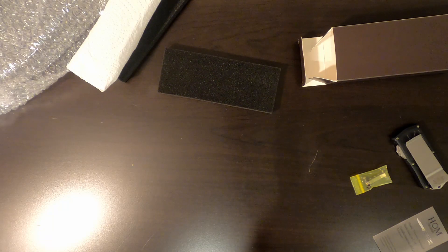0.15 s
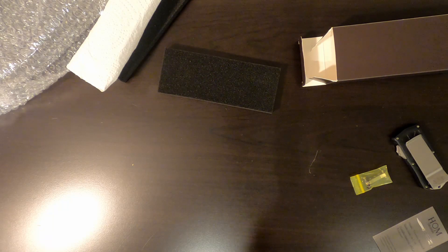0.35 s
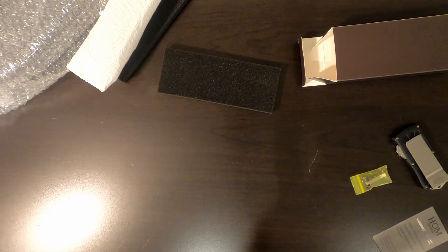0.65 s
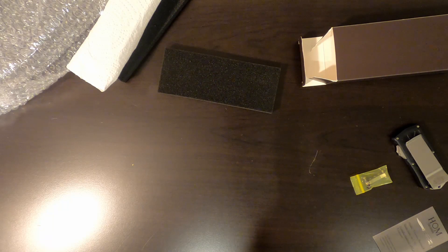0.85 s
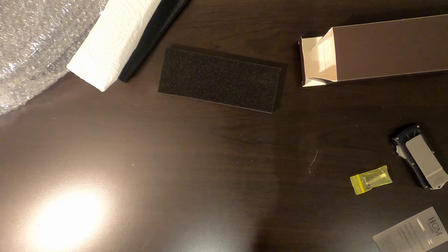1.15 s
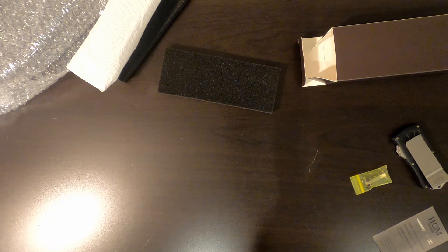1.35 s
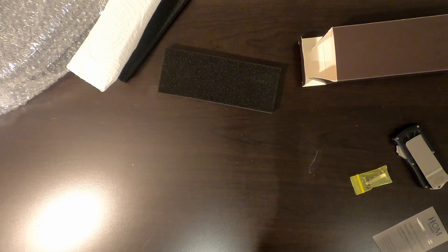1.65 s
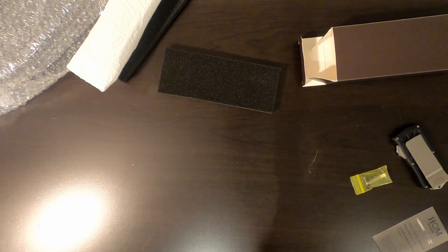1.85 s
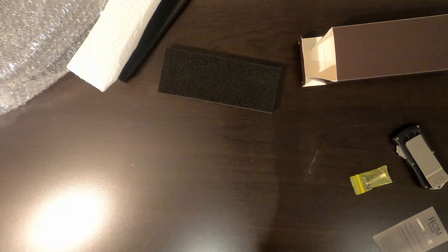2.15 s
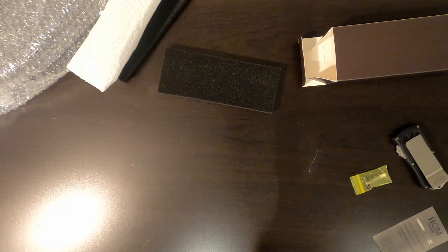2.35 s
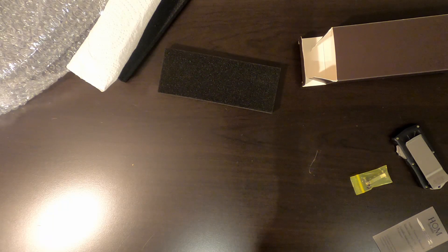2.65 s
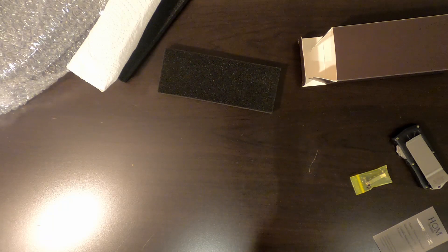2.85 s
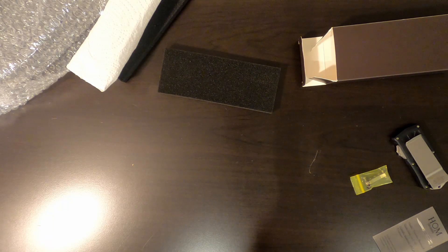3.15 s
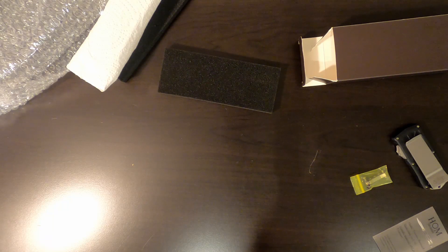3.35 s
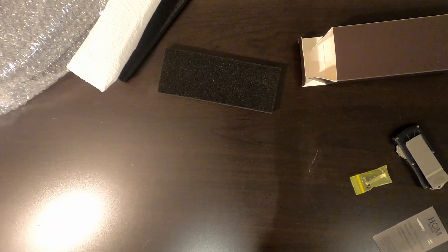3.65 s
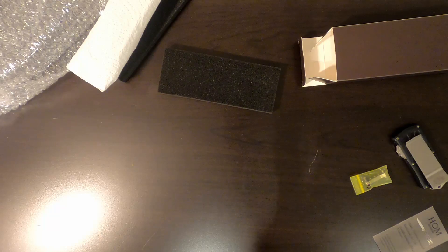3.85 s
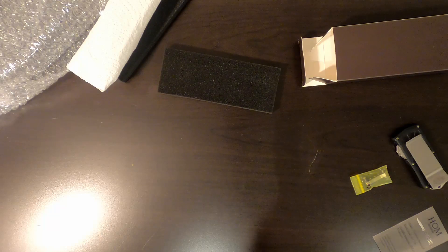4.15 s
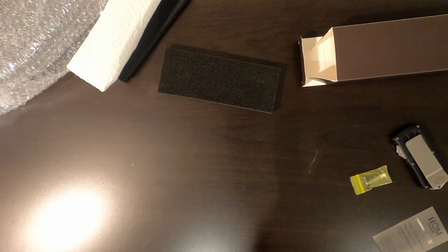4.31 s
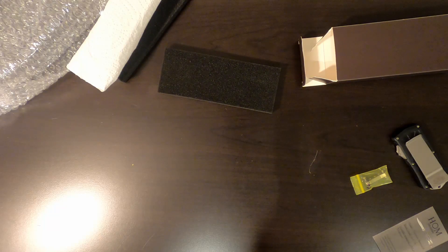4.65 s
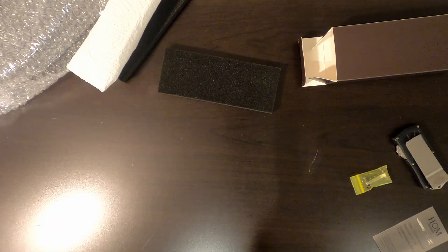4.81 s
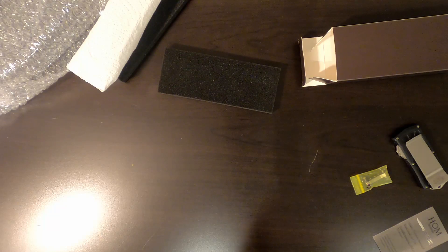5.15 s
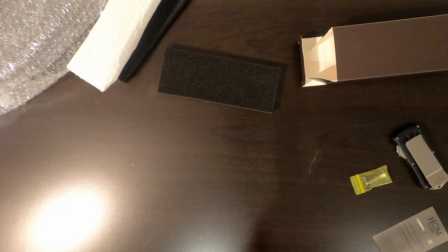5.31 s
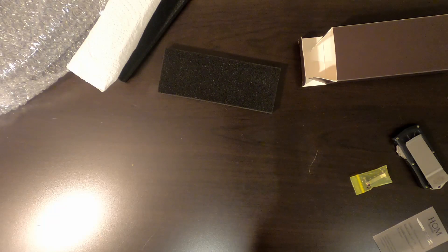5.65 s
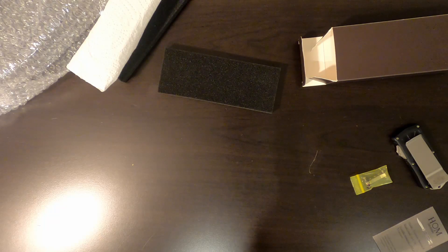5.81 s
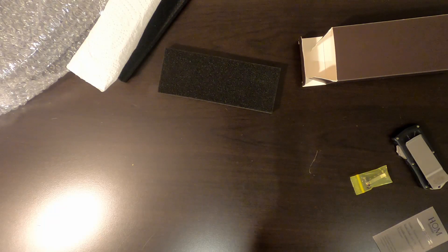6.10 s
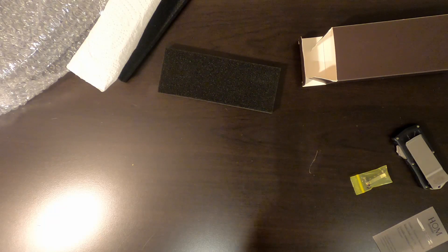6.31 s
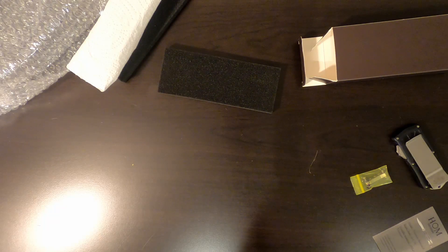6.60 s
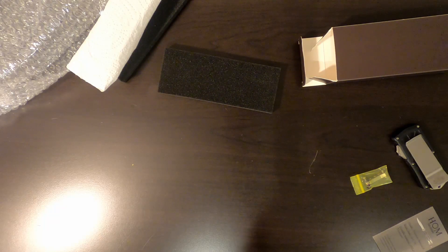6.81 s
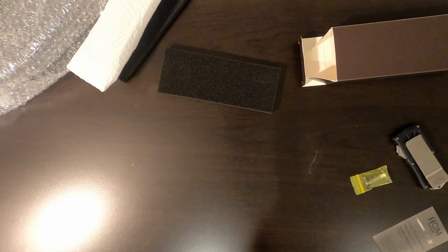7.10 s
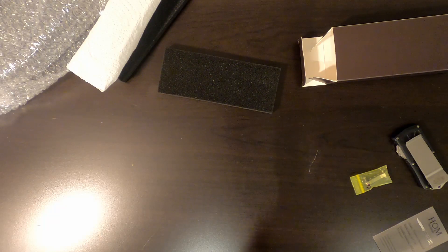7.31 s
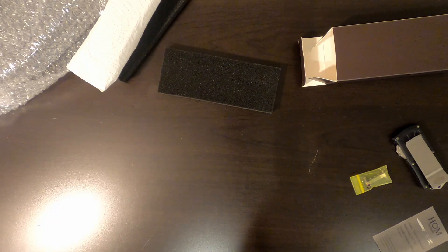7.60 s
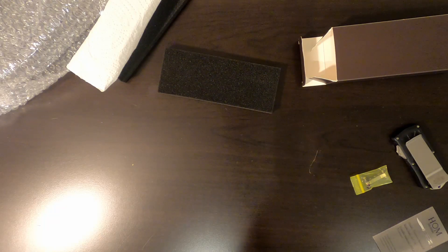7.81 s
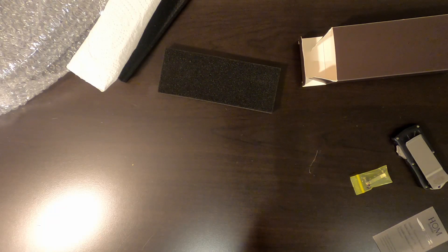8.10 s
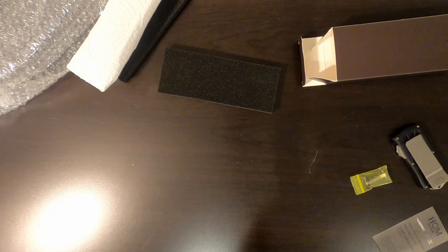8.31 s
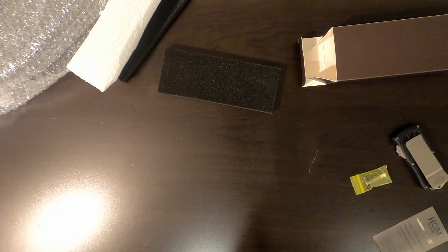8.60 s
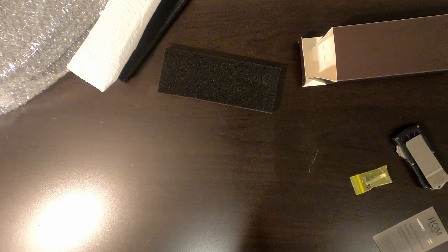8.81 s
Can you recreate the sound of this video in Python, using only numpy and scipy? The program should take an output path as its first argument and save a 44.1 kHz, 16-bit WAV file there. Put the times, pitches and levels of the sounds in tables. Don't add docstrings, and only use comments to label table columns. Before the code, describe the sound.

In a quiet furnished room, a folding knife is flipped close to a small stereo camera microphone. At about 0.1 s the steel handles snap together in a loud, tight clack with a tiny bounce. A very faint finger slide brushes by around 0.3 s. Light clicks follow at 1.0, 1.3 and 1.6 s, with a firmer knock at 1.5, then taps at 2.5 and 2.7 and a clack at 2.9. At 3.8 s a hard, quick rattle shuts the handles, with another at 4.9 after lighter clicks. Single taps lead to a cluster at 6.3 s, a longer bouncing rattle at 7.3-7.4, and a final sharp one at 8.4, followed by faint ticks. Every hit rings briefly, bright and metallic, with short wall echoes. A low, fluttering fan hum, faint whines and soft air continue throughout.

```python
import sys
import numpy as np
from scipy import signal
from scipy.fft import rfft, irfft
from scipy.io import wavfile
from scipy.ndimage import uniform_filter1d

SR = 44100
rng = np.random.default_rng(int(sys.argv[2]) if len(sys.argv) > 2 else 0)


def int16_out(signal):
    q = np.round(np.clip(np.atleast_2d(signal).T, -1, 1) * 32767)
    wavfile.write(sys.argv[1], SR, q.astype(np.int16))


def makeup_ratio(level_db):
    decades = np.asarray(level_db, float) / 20
    return 10 ** decades


N = 395136


def evened(x):
    return x / np.sqrt(np.mean(x ** 2) + 1e-20)


def read(points, hz, column=1):
    rows = np.transpose(points)
    return np.interp(np.log(hz + 1), np.log(rows[0] + 1), rows[column])


def resonate(x, hz, width):
    r = np.exp(-np.pi * width / SR)
    b = [(1 - r * r) / 2, 0, (r * r - 1) / 2]
    a = [1, -2 * r * np.cos(2 * np.pi * hz / SR), r * r]
    return signal.lfilter(b, a, x)


def ring(x, modes):
    t = np.arange(1024) / SR
    shape = np.zeros(1024)
    for k, (hz, width, db) in enumerate(modes):
        shape += makeup_ratio(db) * np.exp(-np.pi * width * t) * np.sin(2 * np.pi * hz * t + 2.477 * k)
    return signal.oaconvolve(x, shape[None] / np.linalg.norm(shape), axes=1)[:, :N]


# (time [s], strength [dB], brightness [dB], handle pitch [Hz])
TAPS = [(0.651, -77, 1.5, 1980), (1.0094, -53.5, 2.5, 2380), (1.3097, -52.5, -8.5, 1980),
        (1.574, -50.5, -1.5, 2060), (1.6, -71, -3, 1800), (2.458, -49, 1, 1980), (2.715, -48, -3.5, 1930),
        (2.7378, -61, -15, 2000), (2.999, -61.5, 2, 2290), (3.4023, -58.5, 6.5, 2070),
        (3.666, -49, -1.5, 1760), (3.9181, -58.5, -6, 2300), (4.5784, -50, 1, 1970),
        (4.9933, -61.5, 1, 1940), (5.0038, -58, 3, 2330), (5.873, -55, 1.5, 1950), (6.1, -50.5, 5.5, 2300),
        (6.1255, -62, -11, 1980), (6.9102, -49.5, 1.3, 2100), (7.0249, -53, 4.5, 1930),
        (7.203, -62, -8, 1860), (7.9627, -50.5, 2.5, 2050), (8.0876, -53.5, 1, 1940),
        (8.538, -65.5, -5, 2180), (8.6204, -67, -6, 2300)]
# (time [s], strength [dB], brightness [dB], weight [dB], handle pitch [Hz])
BLOWS = [(0.0723, -43.5, 5.5, 10.5, 2300), (0.0813, -32.5, -0.5, -15, 2800), (1.4888, -37, 3, -3.5, 1990),
         (2.9146, -43, 2.7, -5, 2010), (3.8098, -41.5, 6.5, -8, 2300), (4.4501, -68.5, -30, 17, 1910),
         (4.4706, -49, 0.2, -4, 2060), (4.8729, -38, 0, -18, 2215), (6.2736, -49.5, 11, -5.5, 2310),
         (6.295, -42, 4.5, -8.5, 1790), (6.3114, -38, 3, -10, 1790), (7.3288, -48, 9, -24, 2070),
         (8.3596, -43.5, 10, -16, 2380)]
# (time [s], strength [dB], brightness [dB], weight [dB])
RATTLE = [(0.0778, -34, 5, 3.5), (0.0821, -31, -3, -10.5), (.101, -55, -18.5, -14.5), (0.108, -45, -11, -6),
          (3.8244, -33.5, 2, -24), (3.8347, -38.5, 9.5, -19.5), (3.8389, -31, -8, -11.5),
          (3.8455, -51.5, 16, 9), (3.8554, -41.5, 1, -3), (3.8684, -48, -8, -5), (4.8826, -31.5, -3, -16),
          (4.889, -37.5, 7, -2), (4.8918, -30.5, -5, -38), (4.923, -51.5, -1, 2), (6.3043, -51, 17.5, -35),
          (6.3162, -45.5, -6, -7), (6.324, -47, 3, -29), (7.3504, -43.5, 2, -7), (7.3654, -47.5, 10, -2),
          (7.377, -42, -6.5, -23), (7.386, -43, 4, -20), (7.3941, -51.5, -7, -29), (7.403, -51, 0, -5),
          (8.3724, -35.5, -4, -10), (8.3782, -37.5, 2.5, -30), (8.385, -41, 4.5, -1.5),
          (8.3961, -40.5, -1.5, -29), (8.414, -45, -5, -29)]
TAP_WEIGHT_DB = -12
SHUT_HZ = 2330


def knocks():
    taps = [(s, db, bright_db, TAP_WEIGHT_DB, hz) for s, db, bright_db, hz in TAPS]
    rattle = [(*row, SHUT_HZ) for row in RATTLE]
    return [*taps, *BLOWS, *rattle]


CHATTER_S = [.0008, .0016, .002, .0028]
# (pitch [Hz], width [Hz], level [dB])
THOCK = [(800, 230, 0.5), (1010, 150, 2), (1244, 230, 6.5)]
# (pitch [Hz], width [Hz], level [dB])
HANDLE = [(1980, 720, -2), (2450, 400, -1.5), (2707, 560, -7), (3107, 720, -15)]
# (pitch [Hz], width [Hz], level [dB])
BLADE = [(4380, 1800, -2), (4840, 220, -2), (5105, 236, 1.5), (5280, 207, -3.5), (6170, 820, -4.5)]
# (pitch [Hz], width [Hz], level [dB])
TICK = [(6750, 700, -1), (7660, 385, -2), (8600, 582, 1), (9300, 450, -1), (10190, 550, -2.5),
        (11120, 800, -5), (13700, 770, -12)]


def knock(strength_db, bright_db, weight_db, grip_hz, rise_s=0.00042, grip_width=300):
    t = np.arange(400) / SR
    fade = np.exp(-(t / np.reshape(CHATTER_S, (4, 1, 1))) ** 1.5)
    grit = rng.standard_normal((4, 2, 400)) * (1 - np.exp(-t / rise_s)) * fade
    part_db = np.array([weight_db + 20, 18.5, bright_db + 16.34, 0.86 * bright_db + 17.5])
    thock = [(hz * grip_hz / SHUT_HZ, width, db) for hz, width, db in THOCK]
    handle = [*HANDLE, (grip_hz, grip_width, 0.5)]
    total = 0
    for shake, modes, db in zip(grit, (thock, handle, BLADE, TICK), strength_db + part_db):
        rung = ring(shake, modes)
        total = total + makeup_ratio(db) * rung / np.linalg.norm(rung, axis=1, keepdims=True)
    return total


# (delay [s], level in first stream [dB], level in second stream [dB])
ECHOES = [(.0027, -15.5, -2.5), (.0052, -10.5, -7.5), (.0081, -8.5, -12)]
# (frequency [Hz], likeness [0-1], lead [rad], left minus right [dB])
PORTS = [(1000, 0.9, 0.8, 0), (2300, 0.66, -0.57, 2.5), (4860, 0.7, -2, 1), (7550, 0.63, -3, -1.5),
         (10300, 0.4, -2.1, -3), (13500, 0.8, 0.5, -4)]
# (frequency [Hz], level [dB])
HOUSING = [(400, -9.5), (800, -6.9), (1200, -1), (1450, -5), (1700, -4.5), (1950, 1), (2400, -2),
           (3100, -0.2), (6300, -1.7), (10500, -1.75), (12000, -3), (15500, -8)]
ECHO_WANDER = 0.3


def knife():
    pair, rows = np.zeros((2, N + 4096)), knocks()
    wander = rng.uniform(-1, 1, (len(rows), len(ECHOES)))
    for (s, *row), shifts in zip(rows, wander):
        sound = knock(*row)
        paths = [(0.00051, 0.008, 0)]
        for (lag, *db), shift in zip(ECHOES, shifts):
            paths.append((lag * (1 + ECHO_WANDER * shift), *db))
        for lag, *db in paths:
            at = round((s + lag) * SR)
            pair[:, at:at + sound.shape[1]] += makeup_ratio(db)[:, None] * sound
    hz = np.fft.rfftfreq(N + 4096, 1 / SR)
    main, other = makeup_ratio(read(HOUSING, hz)) * rfft(pair)
    same = np.clip(read(PORTS, hz), 0, 1)
    lead = np.exp(1j * read(PORTS, hz, column=2))
    lean = makeup_ratio(read(PORTS, hz, column=3) / 2)
    left = (same * main + np.sqrt(1 - same ** 2) * other) * lead * lean
    return irfft(np.array([left, main / lean]), N + 4096)[:, :N]


# (time [s], level [dB])
SLIDE = [
    (.2, -100),
    (.27, -78),
    (.32, -82),
    (.36, -74),
    (.42, -80),
    (0.451, -100),
]
# (pitch [Hz], width [Hz], level [dB])
SKIN = [(3006, 2000, -2.5), (5100, 480, -8), (6400, 2100, -0.5), (8500, 1800, -4)]


def fingers():
    s, db = np.transpose(SLIDE)
    level_db = np.interp(np.arange(N) / SR, s, db, -140, -140)
    rub = rng.standard_normal((2, N)) * makeup_ratio(level_db)
    soft = signal.lfilter(*signal.butter(4, 10200, fs=SR), rub)
    return ring(soft, SKIN)


# (frequency [Hz], time to fall 60 dB [s], level [dB])
ROOM = [(704, 0.12, -14.5), (1490, 0.2, -11.5), (2300, 0.15, -11), (3610, .14, -9.5), (5200, 0.16, -11.5),
        (8000, 0.17, -17), (12870, 0.092, -12)]
TURNS_PER_S = 2.3


def room(x, hold_s=0.024):
    size = SR // 4
    taps = np.zeros((2, 2, size))
    at = np.arange(200, size - 12, 12) + rng.integers(0, 12, (2, 2, (size - 201) // 12))
    np.put_along_axis(taps, at, rng.choice([-1., 1.], at.shape), 2)
    hz, t, z = signal.stft(taps, SR, nperseg=256)
    t60 = read(ROOM, hz)[:, None]
    fall_db = 60 * np.maximum(t - hold_s, 0) / t60
    z = z * makeup_ratio(read(ROOM, hz, column=2)[:, None] - fall_db) / np.sqrt(t60 * 250)
    tails = signal.istft(z, SR, nperseg=256)[1]
    turn = 2 * np.pi * TURNS_PER_S * np.arange(N) / SR
    out = x
    for share, tail in zip((np.cos(turn), np.sin(turn)), tails):
        out = out + signal.oaconvolve(x * share, tail, axes=1)[:, :N]
    return out


# (time [s], hum level [dB])
DRAUGHT = [(0.0, -61), (0.92, -48), (0.97, -54), (1.65, -50.5), (2.52, -56.5), (3.22, -47), (3.59, -54.5),
           (5.06, -47.5), (5.21, -67.5), (5.29, -47), (5.44, -62.5), (5.56, -43.5), (5.64, -53),
           (7.41, -48.5), (7.61, -62), (8.26, -46.5), (8.68, -58.5), (8.96, -55.5)]


def draught(t):
    return np.interp(t, *np.transpose(DRAUGHT))


# (pitch [Hz], width [Hz], level [dB])
WHINES = [(165.3, 2, -69), (502.8, 9.2, -77.5), (1233, 270, -77.5)]
# (pitch [Hz], level [dB])
TONES = [(1047, -78), (8350, -106)]
HUM_HZ, HUM_WIDTH_HZ, HUM_TRIM_DB = 59.2, 6, 0.5
HUM_WAVER = 0.65


def fan():
    t = np.arange(N) / SR
    flutter = resonate(rng.standard_normal(N), HUM_HZ, HUM_WIDTH_HZ)
    flutter = evened(resonate(flutter, HUM_HZ, HUM_WIDTH_HZ * 3))
    steady = np.sqrt(2) * np.sin(2 * np.pi * HUM_HZ * t)
    hum = np.sqrt(1 - HUM_WAVER) * steady + np.sqrt(HUM_WAVER) * flutter
    out = makeup_ratio(draught(t) + HUM_TRIM_DB) * hum * makeup_ratio([[.5], [-.5]])
    for hz, width, db in WHINES:
        noise = rng.standard_normal((3, N))
        mixed = noise[0] + hz / 1500 * noise[1:]
        out = out + makeup_ratio(db) * evened(resonate(resonate(mixed, hz, width), hz, width * 3))
    for hz, db in TONES:
        out = out + np.sqrt(2) * makeup_ratio(db) * np.sin(2 * np.pi * hz * t)
    return out


# (frequency [Hz], level [dB per Hz])
AIR = [(20, -20.5), (53, -7), (85, -15.5), (170, -8), (310, -21), (480, -28), (624, -37), (900, -38),
       (1370, -35), (2460, -48), (5000, -56), (9000, -63), (11000, -71.5), (16000, -74)]
# (frequency [Hz], likeness [-1 to 1])
SAME = [(60, 0.88), (180, 0.96), (550, 0.33), (1650, 0.21), (4970, -0.022), (15000, 0.52)]
# (frequency [Hz], left minus right [dB])
LEAN = [(60, 1.5), (180, 0.5), (550, -0.5), (1650, 5), (4970, 3), (15000, 1)]
AIR_DB = -52.5


def air(lag_s=6e-5, patchy_db=1.47, follow=0.14, gust_db=5.5):
    frames, hz = N // 512 + 5, np.fft.rfftfreq(2048, 1 / SR)
    a, b, c, d, patches = rng.standard_normal((frames, 1025, 5)).T
    patches = evened(uniform_filter1d(uniform_filter1d(patches, 10, 0), 6, 1))
    swell_db = draught(np.arange(frames) * 512 / SR)
    gusts = evened(uniform_filter1d(rng.standard_normal(frames), size=9))
    swell_db = swell_db - swell_db.mean() + gust_db * gusts
    same = np.clip(read(SAME, hz), -1, 1)[:, None]
    left = a + 1j * b
    right = same * left + np.sqrt(1 - same ** 2) * (c + 1j * d)
    right = right * np.exp(2j * np.pi * hz * lag_s)[:, None]
    lean = makeup_ratio(read(LEAN, hz) / 2)[:, None]
    z = np.array([left * lean, right / lean])
    bass = 1 / (1 + (hz[:, None] / 400) ** 2)
    z *= makeup_ratio(read(AIR, hz)[:, None] + patchy_db * patches + follow * swell_db * bass)
    return makeup_ratio(AIR_DB) * evened(signal.istft(z, nperseg=2048, noverlap=1536)[1][:, :N])


def scene():
    return room(knife() + fingers()) + air() + fan()


def low_pass(x):
    return signal.sosfilt(signal.butter(12, 16400, fs=SR, output="sos"), x)


EDGE_HZ = 15820


def record(dry, smear_db=-24, smear_s=0.023):
    ahead = np.arange(1024, 40, -1) / SR
    smear = np.diff(rng.standard_normal((2, 985))) * np.exp(-ahead / smear_s)
    kernel = np.zeros((2, 2049))
    kernel[:, :984] = makeup_ratio(smear_db) * smear / np.linalg.norm(smear[0])
    kernel[:, 1024] = 1
    edge = signal.firwin(255, EDGE_HZ, window=("kaiser", 7), fs=SR)
    kernel = signal.oaconvolve(kernel, edge[None], "same", axes=1)
    fade_in = np.minimum(np.arange(N) / 128, 1)
    mix = signal.oaconvolve(dry, kernel, "same", axes=1) * fade_in
    return low_pass(mix)


dry = scene()
out = record(dry)
int16_out(out)
```